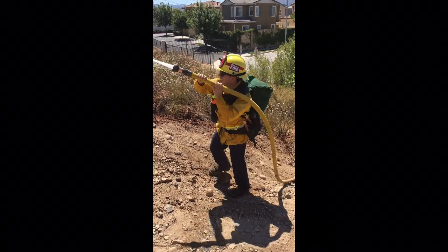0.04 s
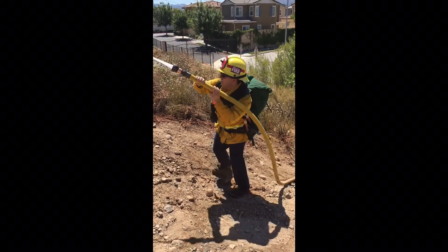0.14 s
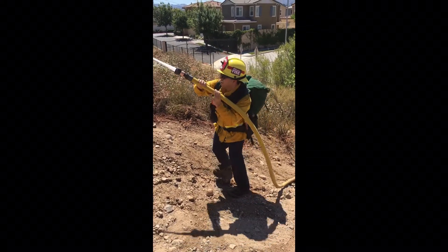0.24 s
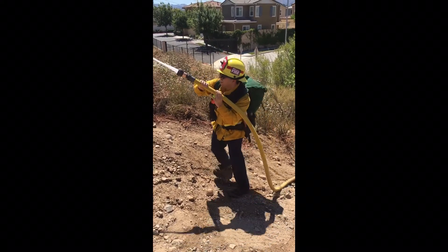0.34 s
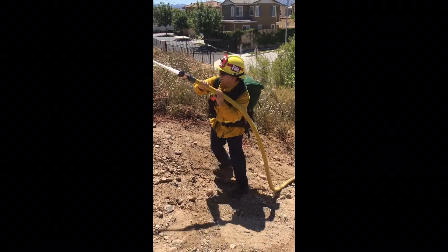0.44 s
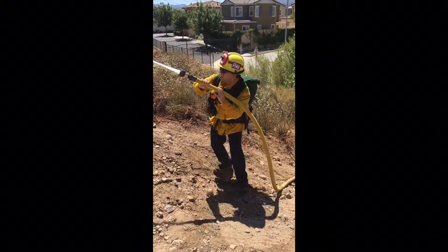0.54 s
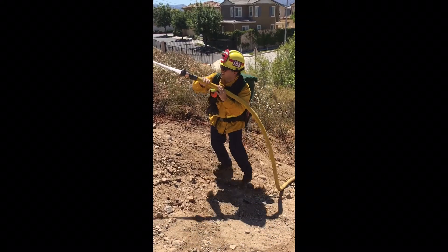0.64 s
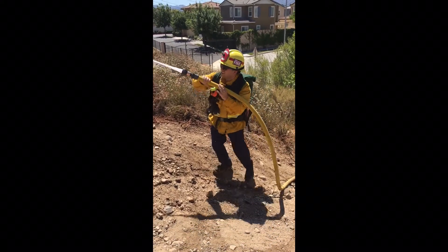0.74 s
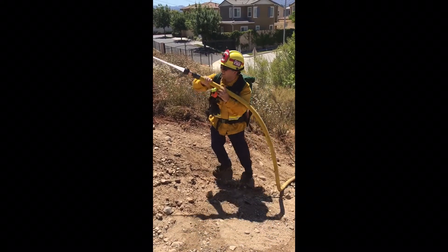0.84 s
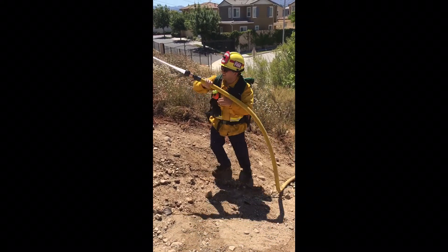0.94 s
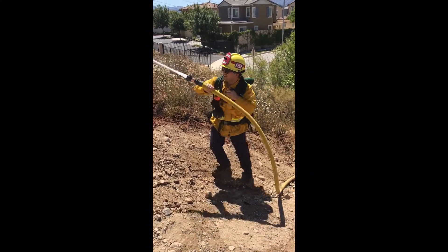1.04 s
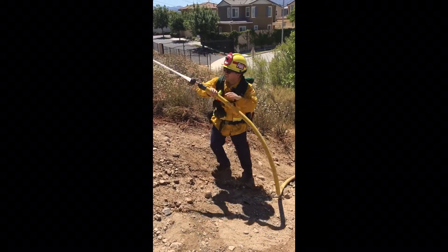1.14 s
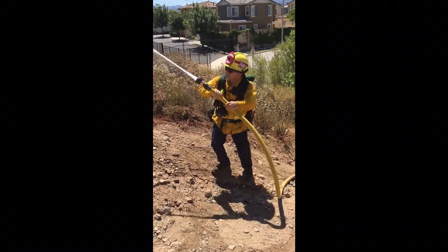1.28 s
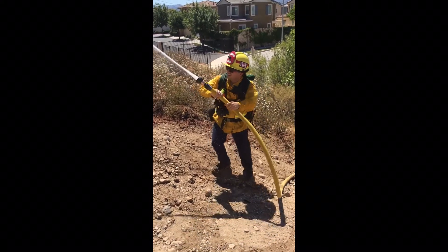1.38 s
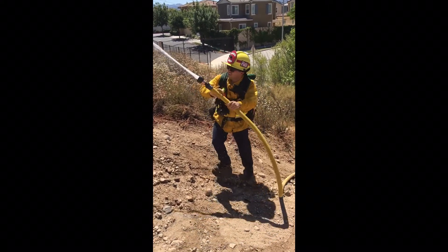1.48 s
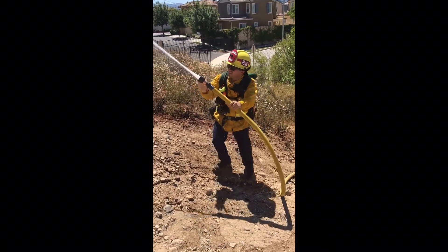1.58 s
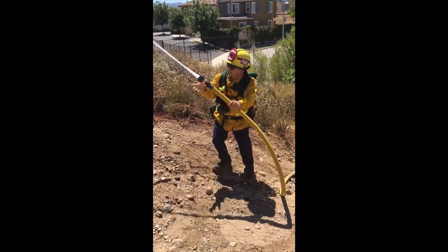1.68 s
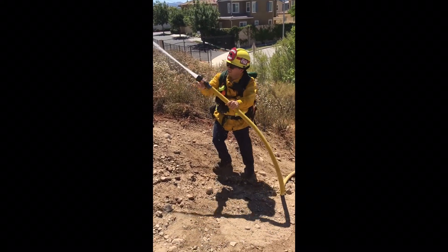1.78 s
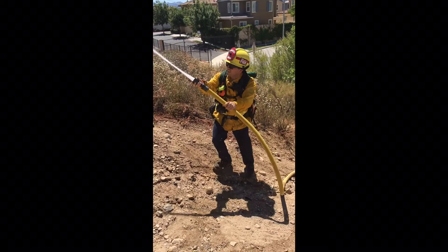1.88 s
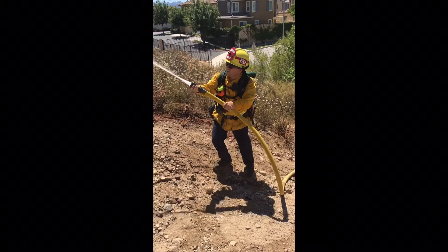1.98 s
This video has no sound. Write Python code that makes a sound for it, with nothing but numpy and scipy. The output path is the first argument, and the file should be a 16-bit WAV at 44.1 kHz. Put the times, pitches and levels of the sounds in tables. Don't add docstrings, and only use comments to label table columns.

```python
import sys
import numpy as np
from scipy import signal
from scipy.fft import rfft, irfft
from scipy.io import wavfile
from scipy.ndimage import uniform_filter1d, map_coordinates

SR = 44100
rng = np.random.default_rng(int(sys.argv[2]) if len(sys.argv) > 2 else 0)


def undo_db(level):
    steps = np.asarray(level, float) / 20
    return 10 ** steps


def output_pcm(signal):
    pcm = np.clip(np.atleast_2d(signal).T, -1, 1) * 32767
    wavfile.write(sys.argv[1], SR, np.round(pcm).astype(np.int16))


N = 88200

TOUCHES = [
    (0.2019, -9.5),
    (0.2064, -12),
    (0.212, -17),
]


def rms_one(x):
    return x / np.sqrt(np.mean(x ** 2) + 1e-20)


def drift(rate):
    r = np.exp(-80 * np.pi * rate / SR)
    slow = signal.lfilter([1], [1, -2 * r, r * r], rng.standard_normal(N // 40 + 2002))[2000:]
    return np.interp(np.arange(N) / 40, np.arange(len(slow)), rms_one(slow - slow.mean()))


def ring(clicks, hz, t60):
    r, w = undo_db(-60 / (t60 * SR)), 2 * np.pi * hz / SR
    return signal.lfilter([0, np.sin(w)], [1, -2 * r * np.cos(w), r * r], clicks + 1e-18)


def click(s, db):
    return undo_db(db) * (np.arange(N) == int(s * SR))


def dying(s, t60):
    t = np.arange(N) / SR - s
    return (t >= 0) * undo_db(-60 * np.maximum(t, 0) / t60)


def swell(s, width_s):
    return np.exp(-((np.arange(N) / SR - s) / width_s) ** 2)


def band(x, low_hz, high_hz):
    return signal.sosfilt(signal.butter(2, [low_hz, min(high_hz, SR / 2.2)], "band", fs=SR, output="sos"), x)


def coloured(source, spectrum, lifts, patchy_db):
    hz = np.maximum(np.fft.rfftfreq(N, 1 / SR), 1)
    points = np.array(spectrum)
    db = np.interp(np.log(hz), np.log(points[:, 0]), points[:, 1], left=-60, right=-60)
    db = db + sum(lift_db / (1 + (2 * (hz - f) / width) ** 2) for f, width, lift_db in lifts)
    whole = rfft(source) * undo_db(db)
    together = drift(4.7)
    out = 0
    for k in range(8, 29):
        share = np.clip(1 - abs(2 * np.log2(hz) - k), 0, 1)
        flicker_db = patchy_db * (0.11 * together + drift(9.2))
        out = out + irfft(whole * share, N) * undo_db(flicker_db)
    return rms_one(out)


def water_noise():
    drops_per_s, spread_db, drop_share = 3000, 1.5, 0.25
    falls = rng.random(N) < drops_per_s / SR
    strength = undo_db(spread_db * np.minimum(rng.exponential(1, N), 5))
    drops = falls * strength * rng.choice([-1, 1], N)
    return np.sqrt(1 - drop_share) * rng.standard_normal(N) + np.sqrt(drop_share) * rms_one(drops)


def off_the_slope(spray):
    # time_s [s], delay_ms [ms]
    ground = [(0, .31), (.5, .302), (1.0, .31), (1.4, .305), (2.0, .31)]
    t = np.arange(N) / SR
    dull = signal.sosfiltfilt(signal.butter(2, 10400, fs=SR, output="sos"), spray)
    late = t - np.interp(t, *np.transpose(ground)) / 1000
    bounce = map_coordinates(dull, [late * SR], order=5, mode="wrap")
    return rms_one(spray + 0.32 * bounce)


def hose():
    # time_s [s], jet_db [dB], spray_db [dB]
    flow = [(0.0, -39, -44.5), (0.12, -40.5, -43.5), (0.25, -41, -44), (0.48, -40.5, -42.5),
            (0.61, -41, -42.5), (0.8, -42.5, -44.5), (1.04, -44, -45.5), (1.18, -42.5, -45.5),
            (1.37, -43, -44), (1.5, -43, -44.5), (1.62, -44, -45.5), (1.75, -42.5, -45),
            (1.86, -44.5, -44.5), (2.0, -44.5, -44.5)]
    # pitch_hz [Hz], level_db [dB per Hz]
    jet_colour = [(300, -10.5), (450, -12), (700, -8), (1100, -5.5), (2500, -3.5), (3400, -10.5),
                  (4200, -11), (6000, -35.5)]
    # pitch_hz [Hz], level_db [dB per Hz]
    spray_colour = [(3000, -19.5), (4200, -1.5), (5000, -3), (6500, -3), (8000, -4), (10500, -4.5),
                    (12000, -4), (15800, -8)]
    # pitch_hz [Hz], width_hz [Hz], lift_db [dB]
    nozzle = [(641, 184, 6.5), (1166, 360, 6), (1677, 74, 4.5), (1885, 27, 6), (2364, 230, 3.5),
              (2978, 220, 7.5), (3460, 31, 10), (6160, 600, -2), (8980, 1300, 2.5)]
    t = np.arange(N) / SR
    s, jet_db, spray_db = np.transpose(flow)
    water = water_noise()
    jet = coloured(water, jet_colour, nozzle, patchy_db=1.0)
    spray = off_the_slope(coloured(water[::-1], spray_colour, nozzle, patchy_db=0.83))
    return undo_db(np.interp(t, s, jet_db)) * jet + undo_db(np.interp(t, s, spray_db)) * spray


def whistles():
    # pitch_hz [Hz], width_hz [Hz], level_db [dB]
    whistle_modes = [(1056, 23, -64.5), (1207, 76, -60), (1692, 45, -61.5), (1895, 23, -66),
                     (2325, 49, -61), (4240, 130, -74.5), (6180, 120, -62.5), (6740, 130, -62),
                     (6980, 110, -67), (9430, 130, -68), (9800, 140, -61)]
    out = 0
    for hz, width, db in whistle_modes:
        tone = rms_one(ring(rng.standard_normal(N), hz, 2.0 / width))
        out = out + undo_db(db + 4 * drift(6)) * tone
    return out


def rumble():
    # pitch_hz [Hz], level_db [dB per Hz]
    rumble_colour = [(12, -53), (20, -37), (35, -12), (60, -2), (94, -3.5), (151, -10.5), (273, -9),
                     (414, -23), (500, -18.5), (650, -17), (1100, -120)]
    # time_s [s], level_db [dB]
    gust = [(0.0, -52.5), (0.2, -53), (.33, -51), (.37, -56), (.41, -50), (.7, -52), (.85, -53.5),
            (1.1, -51), (1.25, -53), (1.4, -53), (2.0, -51)]
    gust_db = np.interp(np.arange(N) / SR, *np.transpose(gust))
    return undo_db(gust_db + 3.5) * coloured(rng.standard_normal(N), rumble_colour, [], patchy_db=0.76)


def partings():
    # centre_s [s], low_hz [Hz], high_hz [Hz], level_db [dB]
    patches = [(.026, 5100, 7000, -52), (.026, 9000, 10400, -55), (.049, 7600, 9700, -53),
               (.049, 11700, 13200, -56), (.560, 12400, 13900, -58), (.769, 11000, 12500, -58),
               (1.79, 6200, 8300, -55), (1.79, 14500, 15900, -60), (1.93, 10300, 11800, -58)]
    length_s = 0.038
    t, hz = np.arange(N) / SR, np.fft.rfftfreq(N, 1 / SR)
    white = rfft(rng.standard_normal(N))
    side = 0
    for s, low_hz, high_hz, db in patches:
        patch = rms_one(irfft(white * (hz > low_hz) * (hz < high_hz), N))
        side = side + undo_db(db) * np.cos(np.pi * np.clip((t - s) / length_s, -.5, .5)) * patch
    return side * np.array([[1], [-1]])


def bumps():
    # centre_s [s], level_db [dB], pitch_hz [Hz], width_s [s]
    soft_bumps = [(.3722, -32.5, 76, .010), (.602, -40, 55, .014), (.23, -41, 45, .018),
                  (.577, -38, 215, .012), (.597, -38, 230, .008), (1.755, -42, 60, .018),
                  (1.1, -46, 75, .018), (1.46, -44, 88, .02), (.105, -44, 90, .02)]
    t = np.arange(N) / SR
    return sum(undo_db(db) * swell(s, width) * np.cos(2 * np.pi * hz * (t - s)) for s, db, hz, width in soft_bumps)


def knocks():
    # start_s [s], peak_db [dB], pitch_hz [Hz], t60_s [s]
    short_knocks = [(.5966, -21, 1300, 0.0079), (0.52, -31, 5000, .002), (.5966, -31, 3000, 0.033),
                    (.5972, -31, 144, 0.021), (0.52, -60, 390, 0.011), (.585, -31, 2700, 0.058),
                    (0.41, -27.5, 3130, .005), (0.55, -26, 2230, 0.023), (0.76, -37, 900, 0.029),
                    (.1333, -23.5, 9700, 0.0056), (0.15, -33, 14000, .003), (.1311, -33, 6000, .003),
                    (.2195, -45, 3600, .02), (.2026, -24, 4550, 0.0088), (.2066, -27, 2000, .004),
                    (.2123, -25, 1750, 0.0045), (.5964, -31, 850, 0.0019)]
    return sum(ring(click(s, db), hz, t60) for s, db, hz, t60 in short_knocks)


def ticks():
    # start_s [s], level_db [dB], centre_hz [Hz], t60_s [s]
    light_ticks = [(0.1316, -37, 4040, .01), (.3800, -37.5, 10500, 0.01), (0.381, -37, 1500, .012),
                   (0.4203, -34.5, 2600, 0.032), (0.451, -35.5, 4000, 0.03), (.471, -34, 1800, .02),
                   (.6120, -29.5, 9500, .01), (1.275, -30, 3000, 0.0053)]
    noise = rng.standard_normal(N)
    out = 0
    for s, db, hz, t60 in light_ticks:
        out = out + undo_db(db) * dying(s, t60) * rms_one(band(noise, hz / 1.6, hz * 1.25))
    return out


def struck_modes():
    mode_hz = [1555, 3018, 3950, 4300, 6050, 7000, 8780, 9500, 10800, 15445]
    # t60_s [s], first_db [dB], second_db [dB], third_db [dB]
    modes = [(0.024, -31, -34, -34), (0.061, -41, -34, -29.5), (0.011, -15, -22, -28),
             (0.014, -14, -25, -21), (0.013, -16, -40, -36), (0.0098, -17.5, -36, -26),
             (0.046, -11.5, -15.5, -42), (0.014, -17, -22, -22), (0.014, -21, -20.5, -42),
             (0.047, -24, -10, -27)]
    contact_s = 0.0032
    out = 0
    for hz, (t60, *strengths) in zip(mode_hz, modes):
        strikes = sum(click(s, db) for (s, _), db in zip(TOUCHES, strengths))
        contact = ring(strikes, hz, contact_s)
        out = out + ring(contact, hz, t60) * 2 * np.log(1000) / (contact_s * SR)
    return out


def crack():
    burst = sum(undo_db(db) * dying(s, 0.0099) for s, db in TOUCHES) * rng.standard_normal(N)
    low_hz, high_hz = 2170, 12700
    return band(band(burst, low_hz, high_hz), low_hz, high_hz)


def main_mode():
    main_hz, main_db, main_t60_s = 13127, -6.5, 0.093
    neighbour_share, neighbour_t60_s, neighbour_beats_hz, neighbour_swell_s = 0.95, 0.079, -203, .2037
    twin_share, twin_beats_hz, twin_swell_s = 0.54, -43, .2154
    t = np.arange(N) / SR
    first, last = TOUCHES[0][0], TOUCHES[-1][0]
    neighbour = np.exp(2j * np.pi * neighbour_beats_hz * (t - neighbour_swell_s))
    neighbour = neighbour_share * dying(first, neighbour_t60_s) * neighbour
    twin = np.exp(2j * np.pi * twin_beats_hz * (t - twin_swell_s))
    twin = twin_share * np.clip((t - last) / 0.0048, 0, 1) * twin
    rise = np.clip((t - first) / 0.00082, 0, 1)
    tone = (np.exp(2j * np.pi * main_hz * t) * (1 + neighbour + twin)).real
    return undo_db(main_db) * rise * dying(first, main_t60_s) * tone


def free_ring():
    free_hz = [4363, 6033, 8590, 8913, 12260, 13110, 15430]
    # t60_s [s], level_db [dB], beats_hz [beats per s], swell_s [s], twin_share [ratio]
    free_modes = [(0.33, -37.5, 7, 0.26, 0.37), (0.16, -27.5, 19.5, 0.232, 0.57),
                  (0.19, -25.5, 16, 0.238, .3), (0.13, -22.5, -24, 0.2366, 0.97),
                  (0.19, -28, -32, 0.2, 0.35), (0.1, -30, 30, 0.226, .9), (.075, -26, 46, 0.27, .4)]
    t = np.arange(N) / SR
    start = TOUCHES[-1][0]
    out = 0
    for hz, (t60, db, beats, swell_s, twin) in zip(free_hz, free_modes):
        pair = np.exp(2j * np.pi * hz * t) * (1 + twin * np.exp(2j * np.pi * beats * (t - swell_s)))
        out = out + undo_db(db) * dying(start, t60) * pair.real
    return out * np.clip((t - start) / 0.0023, 0, 1)


def afterring():
    # pitch_hz [Hz], level_db [dB], t60_s [s]
    tails = [(4363, -50, 0.4), (6033, -42, .45), (12260, -45, .3), (8590, -46, .5), (8913, -51, .45),
             (13110, -33, .25), (15436, -40, .2)]
    start = click(TOUCHES[-1][0], 0)
    return sum(undo_db(db + 3.5 * drift(25)) * ring(start, hz, t60) for hz, db, t60 in tails)


def jingles():
    # start_s [s], level_db [dB], pitch_hz [Hz], t60_s [s]
    retouches = [(.292, -42, 8590, .045), (.3, -42, 8913, .035), (.298, -47, 4363, .03),
                 (.341, -40, 13110, .03), (.453, -41, 15436, .03), (.453, -39, 12262, .025),
                 (.453, -42, 4363, .025), (.474, -43, 15436, .04)]
    return sum(ring(ring(click(s, db), hz, t60), hz, 0.036) / 60 for s, db, hz, t60 in retouches)


def rustle():
    return undo_db(-42) * swell(.604, 0.012) * rms_one(band(rng.standard_normal(N), 600, 2700))


def scene():
    background = hose() + whistles() + rumble()
    handling = bumps() + knocks() + ticks() + rustle()
    metal_clip = struck_modes() + crack() + main_mode() + free_ring() + afterring() + jingles()
    return np.tile(background + handling + metal_clip, (2, 1))


def gain_control(dry):
    threshold_db, duck_share, recover_db_per_s, lag_s = -31.5, 0.23, 23.5, 0.13
    t = np.arange(N) / SR
    level_db = 10 * np.log10(uniform_filter1d(dry[0] ** 2, size=88) + 1e-12)
    over = np.maximum(level_db - threshold_db, 0) * duck_share
    duck_db = np.maximum.accumulate(over + recover_db_per_s * t) - recover_db_per_s * t
    lag = np.exp(-1 / (lag_s * SR))
    duck_db = signal.lfilter([1 - lag], [1, -lag], duck_db)
    return dry * undo_db(-duck_db)


def band_limit(x):
    return signal.sosfilt(signal.butter(12, 17120, fs=SR, output="sos"), x)


def record(dry):
    overload = .66
    rounded = overload * np.tanh(gain_control(dry) / overload)
    top_cut = signal.ellip(12, .5, 70, 15750, fs=SR, output="sos")
    mix = signal.sosfilt(top_cut, rounded) + partings()
    return band_limit(mix)


dry = scene()
out = record(dry)
output_pcm(out)
```